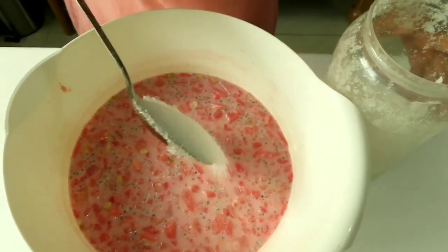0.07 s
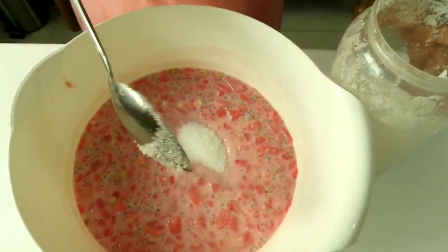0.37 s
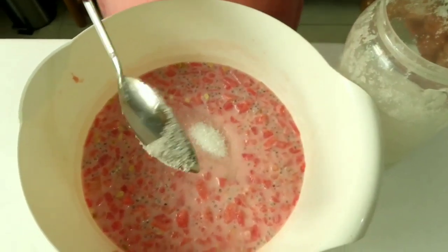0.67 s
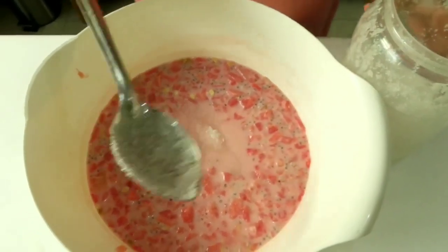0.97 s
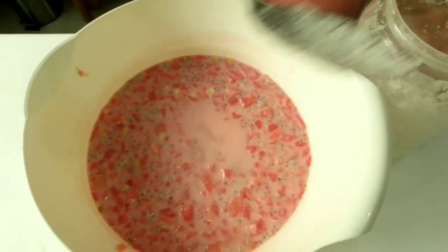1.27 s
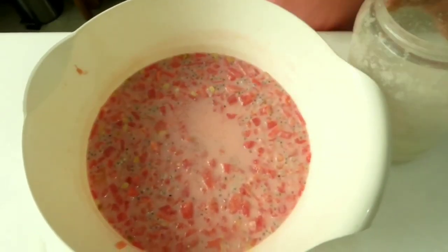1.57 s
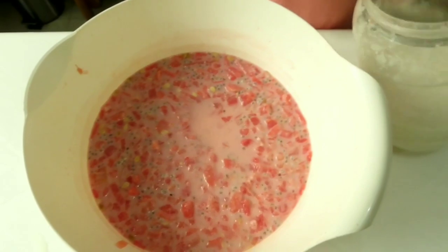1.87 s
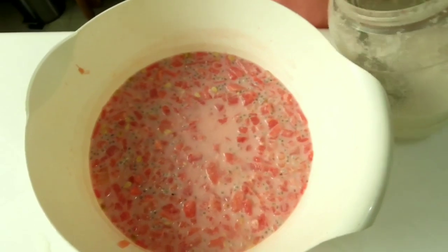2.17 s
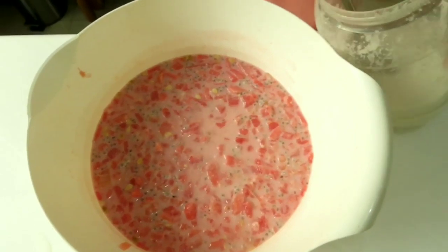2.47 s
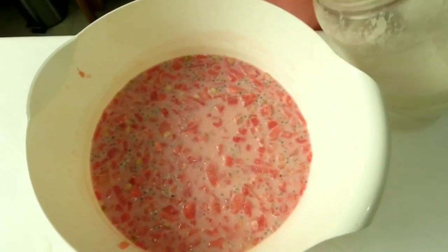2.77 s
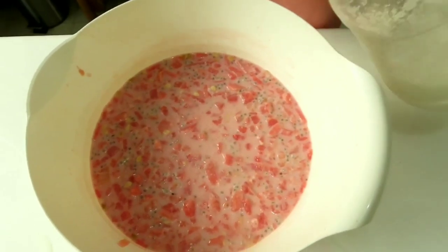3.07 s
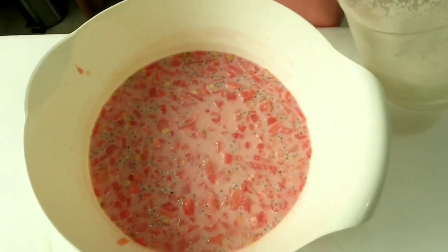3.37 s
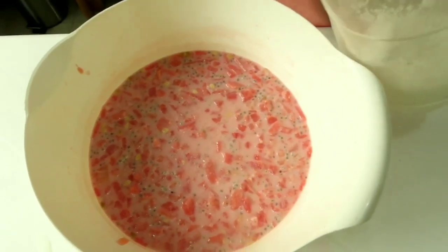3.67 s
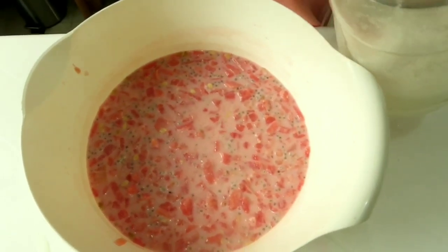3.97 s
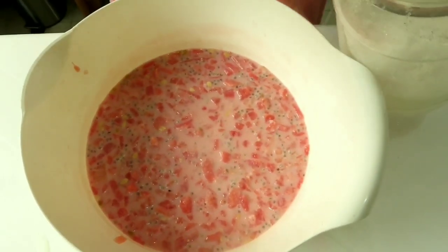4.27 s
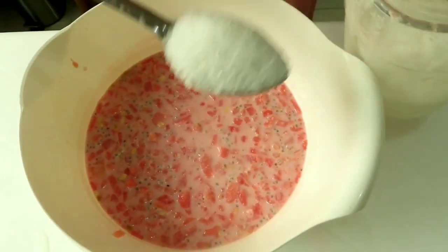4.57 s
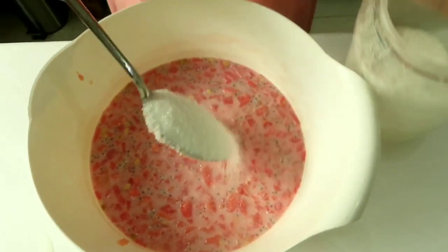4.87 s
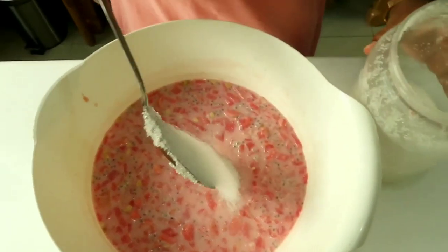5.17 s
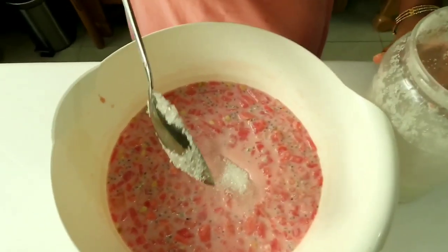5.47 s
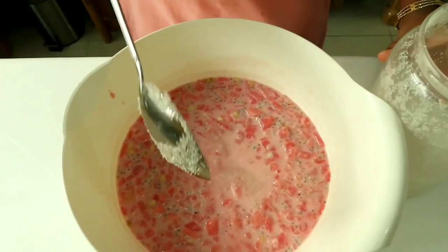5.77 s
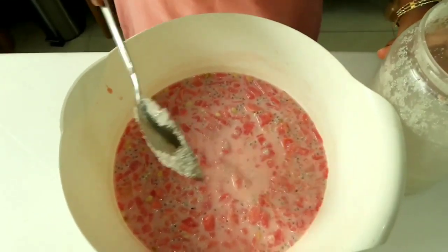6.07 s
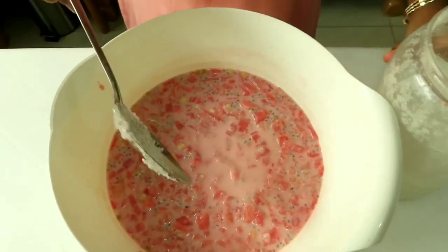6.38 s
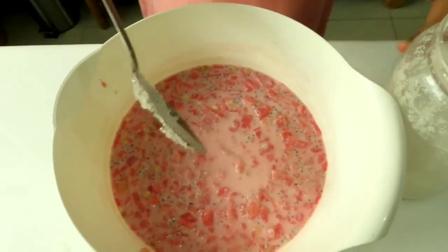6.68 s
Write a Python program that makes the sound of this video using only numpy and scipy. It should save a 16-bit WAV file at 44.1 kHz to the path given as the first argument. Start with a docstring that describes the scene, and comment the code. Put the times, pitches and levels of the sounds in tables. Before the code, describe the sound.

A steel spoon pours hissing sugar, clinks on a glass jar and scoops grittily, then two dull table thumps over a motor hum.

```python
"""Sugar is spooned from a glass jar into a bowl of fruit and milk in a small kitchen where a motor hums.
First sugar hisses off the steel spoon, and bangles begin to jingle faintly on a wrist.
Near 2 s the spoon clinks on the hand-held jar, then digs in with a gritty scrape.
Around 4 s loose crystals patter back into the jar as the heaped spoon lifts.
At 5 s it pours again, and two dull thumps shake the table."""
import sys
import numpy as np
from scipy import signal
from scipy.fft import rfft, irfft, next_fast_len
from scipy.io import wavfile
from scipy.ndimage import map_coordinates

SR = 44100
rng = np.random.default_rng(int(sys.argv[2]) if len(sys.argv) > 2 else 0)


def master(y):
    """Save y as 16-bit WAV."""
    cut = np.clip(np.atleast_2d(y).T, -1, 1)
    pcm = np.round(cut * 32767)  # scale
    wavfile.write(sys.argv[1], SR, pcm.astype(np.int16))


N = 301114


def amp(db):
    """Decibels to amplitude gain."""
    return 10 ** (np.asarray(db) / 20)


def unit(x):
    """Normalisation to rms 1."""
    return x / np.sqrt(np.mean(x ** 2) + 1e-20)


def along(points, hz):
    """Interpolation of (Hz, value) points on a logarithmic frequency axis."""
    freqs, values = np.transpose(points)
    return np.interp(np.log(hz + 1), np.log(freqs + 1), values)


def wobble(rate):
    """Random modulation: a smooth curve through `rate` random values a second."""
    return map_coordinates(rng.standard_normal(int(N * rate / SR) + 4), [np.arange(N) * rate / SR])


def filtered(x, response):
    """Linear filtering: the spectrum of x times a frequency response."""
    n = x.shape[-1]
    padded = next_fast_len(n + 8192)
    return irfft(rfft(x, padded) * response(np.fft.rfftfreq(padded, 1 / SR)), padded)[..., :n]


def coloured(x, spectrum):
    """Spectral shaping by (Hz, dB) points."""
    return filtered(x, lambda hz: amp(along(spectrum, hz)))


def add(track, s, sound):
    """Superposition: a sound joins the track at s seconds."""
    part = track[..., max(round(s * SR), 0):][..., :sound.shape[-1]]
    part += sound[..., :part.shape[-1]]


def ring(modes, attack, tilt_db=0):
    """Modal decay: a blow excites damped sines at slightly random strengths, tilted per octave; peak 1."""
    t = np.arange(SR * 6 // 10) / SR
    y = sum(amp(db + rng.normal() + tilt_db * np.log2(hz) - 60 * t / t60) * np.sin(2 * np.pi * hz * t)
            for hz, db, t60 in modes)
    y *= 1 - np.exp(-(t / attack) ** 2)
    return y / np.abs(y).max()


def burst(response, t60, attack):
    """Impact transient: filtered noise that decays exponentially; peak 1."""
    t = np.arange(SR // 20) / SR
    y = filtered(rng.standard_normal(len(t)), response) * (1 - np.exp(-t / attack)) * amp(-60 * t / t60)
    return y / np.abs(y).max()


def gestures(moves, attack, fade_db_per_s, sag_db_per_s=0):
    """Incoherent addition: (start, length, dB) envelopes rise, hold or sag, fade, and sum in power."""
    gains = []
    for s, length, db in moves:
        t = np.maximum(np.arange(N) / SR - s, 0)
        rise = np.sin(np.pi / 2 * np.minimum(t / attack, 1))
        gains.append(rise * amp(db - sag_db_per_s * t - fade_db_per_s * np.maximum(t - length, 0)))
    return np.linalg.norm(gains, axis=0)


# Likeness of reflections. Each row: frequency in Hz, left-right coherence.
ROOM_COHERENCE = [(220, 1), (600, .95), (2000, 0.98), (4000, 0.92), (7000, 0.9), (13000, 0.17)]
def spread(pair, coherence=ROOM_COHERENCE):
    """Mid-side mixing: two independent signals become left and right with a given coherence."""
    def weights(hz):
        angle = np.arccos(np.clip(along(coherence, hz), -1, 1)) / 2
        return np.array([np.cos(angle), np.sin(angle)])
    mid, side = filtered(pair, weights)
    return np.array([mid + side, mid - side])


def grains(rate, scatter_db, spectrum, coherence=ROOM_COHERENCE):
    """Shot noise: `rate` random collisions a second, a few much harder than the rest; stereo, rms 1."""
    hit = rng.random((2, N)) < rate / SR
    size = amp(scatter_db * np.minimum(rng.standard_normal((2, N)), 2))
    impulses = hit * size * rng.choice([-1, 1], (2, N))
    return unit(spread(coloured(impulses, spectrum), coherence))


def from_right(x, lead_s, louder_db):
    """Time and level cues: the right channel is earlier and, above the bass, louder."""
    side = np.array([[-1], [1]])
    def response(hz):
        shadow = amp(side * louder_db / 2 * hz / (hz + 600))
        return shadow * np.exp(1j * np.pi * side * hz * lead_s)
    return filtered(x, response)


# The kitchen's decay. Each row: frequency in Hz, time to fall 60 dB (T60) in seconds.
KITCHEN_T60 = [(100, 0.64), (500, 0.46), (2000, 0.57), (5000, 0.32), (12000, 0.34)]
def in_kitchen(x, wet_db, gap_s=0.006):
    """Reverberation: reflections from hard walls follow the direct sound after a short gap."""
    hz, _, noise = signal.stft(rng.standard_normal((2, SR * 6 // 10)), SR, nperseg=256)
    t = np.arange(noise.shape[-1]) * 128 / SR
    decay = amp(-60 * t / along(KITCHEN_T60, hz)[:, None])
    tail = spread(signal.istft(noise * decay, SR, nperseg=256)[1])
    response = np.pad(amp(wet_db) * tail / np.linalg.norm(tail[0]), ((0, 0), (round(gap_s * SR), 0)))
    response[:, 0] += 1  # direct path
    return signal.fftconvolve(np.atleast_2d(x), response, axes=1)[:, :x.shape[-1]]


# Moving air. Each row: frequency in Hz, spectral level in dB.
AIR_SPECTRUM = [(12, -35), (20, -12), (44, -3), (70, -6), (90, -7.5), (148, -3.5), (166, -8.5), (196, -3.5),
                (259, -13.5), (289, -14), (465, -17.5), (906, -18.5), (1300, -25), (1670, -25),
                (15500, -48)]
# Its stereo likeness. Each row: frequency in Hz, left-right coherence.
AIR_COHERENCE = [(100, 1), (250, 0.95), (600, 0.2), (2500, 0.28), (14000, 0.24)]
# The motor's partials. Each row: frequency in Hz, rms level in dB.
MOTOR_PARTIALS = [(48.4, -72), (96.9, -50.5), (145.3, -51.5), (193.8, -52.5), (742.9, -77)]
def room_tone():
    """Broadband and tonal noise: air moves and a motor hums, wavering in level and phase."""
    t = np.arange(N) / SR
    air = unit(spread(coloured(rng.standard_normal((2, N)), AIR_SPECTRUM), AIR_COHERENCE))
    hum = np.zeros(N)
    for hz, db in MOTOR_PARTIALS:
        amplitude = np.sqrt(2) * amp(db + 2.4 * wobble(4.2))
        hum += amplitude * np.sin(2 * np.pi * hz * t + 0.13 * wobble(2.95))
    return amp(-44) * air + hum


# Shivers of the bangles. Each row: start in seconds, length in seconds, relative level in dB.
BANGLE_SHAKES = [(1.095, 0.055, -61), (1.47, 0.075, -65), (1.645, 0.12, -55.5), (1.84, 0.095, -63),
                 (2.022, .16, -50.5), (2.429, 0.1, -55.5), (4.927, 0.078, -63), (5.78, 0.092, -59.5),
                 (6.79, .06, -62)]
# Modes of the hoops. Each row: frequency in Hz, level in dB, T60 in seconds.
HOOP_MODES = [(8500, 1, 0.017), (9100, -4, 0.018), (11560, 8, 0.018), (11950, -6, .02), (12400, 4, 0.025)]
def bangles():
    """Random excitation: many tiny contacts keep thin metal hoops ringing."""
    out = np.zeros((2, N))
    for s, length, db in BANGLE_SHAKES:
        count = int(length * SR)
        contacts = rng.standard_normal((2, count)) * np.hanning(count) ** 0.14
        shiver = signal.fftconvolve(contacts, ring(HOOP_MODES, attack=0.00035)[None], axes=1)
        add(out, s, amp(db - 2.5) * shiver / (shiver[:, :count].std() + 1e-9))
    return spread(out)


# Thin rustles. Each row: start in seconds, length in seconds, level in dB, half-width in Hz.
RUBS = [(0.046, 0.085, -55, 450), (2.119, 0.033, -55, 120)]
def rustles(centre_hz=5250):
    """Resonance: light rubbing excites one high, narrow band."""
    noise = rng.standard_normal(N)
    out = np.zeros(N)
    for s, length, db, width_hz in RUBS:
        band = unit(filtered(noise, lambda hz: 1 / (1 + ((hz - centre_hz) / width_hz) ** 2)))
        out += band * gestures([(s, length, db)], attack=0.02, fade_db_per_s=300)
    return out


# Soft pushes on the table. Each row: start in seconds, peak level in dB.
TABLE_NUDGES = [(1.528, -30), (2.112, -31), (2.381, -27.5), (2.679, -31), (2.772, -30), (3.931, -33.5),
                (4.012, -27.5), (4.27, -32), (6.663, -31)]
# The table's lowest modes. Each row: frequency in Hz, level in dB, T60 in seconds.
SWAY_MODES = [(91, 6.5, 0.22), (108.7, 6, 0.12), (234, -5, 0.17)]
def nudges():
    """Low-mode excitation: a gentle push stirs only the slowest sway of the table."""
    out = np.zeros(N)
    for s, db in TABLE_NUDGES:
        add(out, s, amp(db) * ring(SWAY_MODES, attack=0.0078))
    return out


# Dull blows. Each row: start in seconds, level in dB, contact cutoff in Hz, relative boom in dB.
TABLE_BLOWS = [(5.3332, -0.9, 790, 2.5), (5.6601, -12, 396, -2), (5.6712, -12, 395, -4)]
# The table top's first heave. Each row: frequency in Hz, level in dB, T60 in seconds.
HEAVE_MODES = [(228.4, 2, 0.028), (292, -13, 0.069), (544, -11.5, 0.039)]
# The boom that follows. Each row: frequency in Hz, level in dB, T60 in seconds.
BOOM_MODES = [(88.4, -21.5, 0.65), (159.8, -13, 0.33), (236, -32, 0.25), (267.7, -25, 0.28),
              (328, -20.5, 0.21), (535, -36.5, 0.36), (614, -24, 0.11)]
def thumps():
    """Soft contact is a low-pass filter: the table heaves, then booms, while things on it rattle."""
    out = np.zeros((2, N))
    rattle_spectrum = [(700, 5.5), (1250, -4), (2400, -14), (9000, -34)]  # Hz, dB
    for s, db, cutoff_hz, boom_db in TABLE_BLOWS:
        blow = ring(HEAVE_MODES, attack=0.00098) + amp(boom_db - 9) * ring(BOOM_MODES, attack=0.012)
        # The table radiates no deep bass.
        passband = signal.butter(2, [55, cutoff_hz], "bandpass", fs=SR, output="sos")
        add(out, s, amp(db) * in_kitchen(signal.sosfilt(passband, blow), wet_db=-11))
        rattle = burst(lambda hz: amp(along(rattle_spectrum, hz)), t60=0.065, attack=0.00063)
        add(out, s, amp(db - 20.5) * in_kitchen(np.pad(rattle, (0, SR // 3)), wet_db=-4.5))
    return out


# Touches of the spoon. Each row: start in seconds, level in dB, centre in Hz, half-width in octaves.
SPOON_TICKS = [(1.013, -36.5, 4050, 0.12), (1.1292, -37.5, 2780, 0.36), (1.437, -40, 2640, 0.43),
               (3.9758, -30, 3830, 0.61), (4.128, -30.5, 3930, 0.64), (4.169, -32, 3980, 1.2),
               (4.576, -34.5, 3460, 1.3), (4.8791, -26.5, 3360, 0.45), (5.539, -37.5, 3400, 0.33),
               (5.668, -35, 3200, 0.59), (6.511, -43.5, 8450, 0.29), (6.591, -39, 2800, 0.55)]
def ticks():
    """Point excitation: each glancing touch is coloured by the spot that it meets."""
    out = np.zeros(N)
    for s, db, centre_hz, octaves in SPOON_TICKS:
        band = lambda hz: 1 / (1 + (np.log2((hz + 1) / centre_hz) / octaves) ** 2)
        add(out, s, amp(db) * burst(band, t60=0.017, attack=0.00032))
    return in_kitchen(out, wet_db=-13)


# Pours. Each row: start in seconds, length in seconds, level in dB, fade in dB per second.
SPOON_POURS = [(0.039, .34, -51, 60), (0.541, .05, -53, 280), (5.0, .1, -60, 100), (5.07, 0.28, -51, 81),
               (5.47, 0.18, -58, 180)]
# Falling sugar. Each row: frequency in Hz, spectral level in dB.
HISS_SPECTRUM = [(500, -2), (2000, -3), (4800, -1.5), (7000, -3), (10000, -1.5), (14000, -2), (15700, -8)]
# Its stereo likeness. Each row: frequency in Hz, left-right coherence.
HISS_COHERENCE = [(2000, 0.6), (7000, 1), (13000, 0.56)]
def pouring():
    """Granular flow: an uneven stream of crystals lands in the bowl, thinning as the spoon empties."""
    pours = [gestures([(s, length, db)], attack=0.03, fade_db_per_s=fade, sag_db_per_s=2)
             for s, length, db, fade in SPOON_POURS]
    flow = np.linalg.norm(pours, axis=0) * amp(0.8 * wobble(25))
    return flow * grains(rate=9000, scatter_db=5.5, spectrum=HISS_SPECTRUM, coherence=HISS_COHERENCE)


# Spills. Each row: start in seconds, length in seconds, fine patter in dB, coarse grains in dB.
SPOON_SPILLS = [(3.789, .26, -51.5, -54), (4.11, 0.12, -55, -52), (4.2, .3, -45.5, -53),
                (4.544, .07, -53, -57.5)]
# Fine patter in the jar. Each row: frequency in Hz, spectral level in dB.
PATTER_SPECTRUM = [(600, -25), (1800, -12), (2500, -1), (3200, -1), (4300, 1), (5400, -9), (8000, -10),
                   (11000, -14.5), (15000, -20)]
# A thin rasp as the spoon leaves. Each row: frequency in Hz, spectral level in dB.
RASP_SPECTRUM = [(1400, -27), (2000, 3), (2350, -11), (2750, 5), (3500, -19), (7000, -33)]
def spilling():
    """Granular impacts: off the heaped spoon, fine crystals patter and coarse ones tick; a rasp follows."""
    fine = [(s, length, db) for s, length, db, _ in SPOON_SPILLS]
    coarse = [(s, length, db) for s, length, _, db in SPOON_SPILLS]
    attack_s, fade_db_per_s = 0.072, 263
    patter = gestures(fine, attack_s, fade_db_per_s)
    patter = patter * grains(rate=3400, scatter_db=7, spectrum=PATTER_SPECTRUM)
    ticking = gestures(coarse, attack_s, fade_db_per_s)
    ticking = ticking * grains(rate=130, scatter_db=5, spectrum=HISS_SPECTRUM)
    leaving = gestures([(4.6, 0.19, -56)], attack_s, fade_db_per_s=110)
    rasp = leaving * grains(rate=4500, scatter_db=4, spectrum=RASP_SPECTRUM)
    return in_kitchen(patter + ticking + rasp, wet_db=-16)


# Strokes through the sugar. Each row: start in seconds, length in seconds, grinding in dB,
# sliding in dB, jar rumble in dB.
SPOON_STROKES = [(2.203, 0.059, -42, -45.5, -36.5), (2.305, 0.07, -43, -64, -39),
                 (2.524, 0.12, -45, -48, -52), (2.713, 0.13, -42, -38.5, -43), (2.904, 0.23, -38, -40, -45),
                 (3.123, .14, -34, -33, -41), (3.273, 0.31, -62, -34, -57),
                 (3.539, 0.071, -39.5, -39.5, -42)]
STROKE_ATTACK_S = 0.097
# Crushed sugar. Each row: frequency in Hz, spectral level in dB.
GRIT_SPECTRUM = [(300, -18), (560, -5.5), (850, -19), (1400, -4), (2300, -4.5), (3000, -5), (4200, -5),
                 (5300, -15.5), (8000, -20), (11000, -24.5), (15000, -35)]
# Crystals on steel. Each row: frequency in Hz, spectral level in dB.
SLIDE_SPECTRUM = [(500, -16.5), (1600, -9), (2350, -0.5), (3000, -2), (3700, 0), (4550, 2), (5400, -6),
                  (8000, -9), (10500, -13), (15000, -18)]
def scooping():
    """Stick-slip friction: the spoon grinds and cracks crumbs; loose crystals slide on after it stops."""
    grinds = [(s, length, db) for s, length, db, _, _ in SPOON_STROKES]
    slides = [(s, length, db) for s, length, _, db, _ in SPOON_STROKES]
    scrape = gestures(grinds, STROKE_ATTACK_S, fade_db_per_s=132)
    slide = gestures(slides, STROKE_ATTACK_S, fade_db_per_s=55)
    slips = unit(amp(0.71 * wobble(130)))
    grinding = scrape * slips * grains(rate=2500, scatter_db=1.5, spectrum=GRIT_SPECTRUM)
    crumbs = scrape * amp(-6) * grains(rate=67, scatter_db=2, spectrum=GRIT_SPECTRUM)
    flicker = unit(amp(1.35 * wobble(90)))
    sliding = slide * flicker * grains(rate=7400, scatter_db=1.5, spectrum=SLIDE_SPECTRUM)
    return in_kitchen(grinding + crumbs + sliding, wet_db=-13)


# The hand tilts the jar. Each row: start in seconds, length in seconds, level in dB.
JAR_TILTS = [(1.652, 0.2, -41.5), (3.858, 0.19, -50), (6.49, 0.2, -49)]
# The hollow of the jar. Each row: frequency in Hz, spectral level in dB.
HOLLOW_SPECTRUM = [(60, -18), (130, 0), (230, 5.5), (330, 6), (450, -1), (600, -3), (850, -12), (2000, -38)]
def handling():
    """Friction noise: the jar rubs and rumbles in the hand when it is tilted or the spoon pushes."""
    strokes = [(s, length, db) for s, length, _, _, db in SPOON_STROKES]
    tilts = gestures(JAR_TILTS, attack=0.086, fade_db_per_s=116)
    pushes = gestures(strokes, STROKE_ATTACK_S, fade_db_per_s=116)
    rumble = grains(rate=990, scatter_db=3, spectrum=HOLLOW_SPECTRUM)
    return in_kitchen(np.hypot(tilts, pushes) * rumble, wet_db=-7)


# Pushes that reach the jar's base. Each row: start in seconds, level in dB.
BASE_KNOCKS = [(2.2223, -14), (2.477, -28), (2.674, -28.5), (3.25, -19), (3.297, -32), (4.039, -19)]
# Modes of the base. Each row: frequency in Hz, level in dB, T60 in seconds.
BASE_MODES = [(213, -23, 0.021), (344, 14.5, 0.034), (414, 14.5, 0.021), (568, -1.5, 0.068),
              (1052, 12, 0.018), (1320, -6.5, 0.0073)]
def knocks():
    """Impulse response: the spoon's hardest pushes briefly ring the base of the jar."""
    out = np.zeros((2, N))
    for s, db in BASE_KNOCKS:
        add(out, s, amp(db) * in_kitchen(ring(BASE_MODES, attack=0.00043), wet_db=-4))
    return out


# The spoon breaks the largest lumps. Each row: start in seconds, level in dB.
LUMP_BREAKS = [(2.2162, -11), (2.2209, -5), (2.24, -19), (2.2564, -15.5), (2.2881, -14), (3.067, -16),
               (3.089, -18), (3.117, -18), (3.141, -15.5), (3.165, -15), (3.173, -14), (3.197, -17),
               (3.212, -14), (3.2226, -11.5), (3.292, -15.5), (3.353, -18.5), (3.41, -20), (3.581, -21)]
def crunches():
    """Brittle fracture: packed sugar gives way within milliseconds, each lump at its own pitch."""
    out = np.zeros(N)
    pitches_hz = 2900 * np.exp(0.32 * rng.standard_normal(len(LUMP_BREAKS)))
    for (s, db), pitch_hz in zip(LUMP_BREAKS, pitches_hz):
        lump = lambda hz: amp(along(GRIT_SPECTRUM, hz) + 6.7 * np.exp(-((hz - pitch_hz) / 600) ** 2))
        add(out, s, amp(db) * burst(lump, t60=0.02, attack=0.00025))
    return in_kitchen(out, wet_db=-8)


# The spoon strikes the glass. Each row: start in seconds, level in dB, tilt in dB per octave.
SPOON_CLINKS = [(1.9017, -4, 2), (4.038, -26.5, 2.5)]
# Modes of jar and spoon. Each row: frequency in Hz, level in dB, T60 in seconds.
JAR_MODES = [(277, -5.5, 0.026), (487, -14, 0.05), (580, -8.5, 0.036), (1220, -6, 0.02), (1586, 1, 0.012),
             (2157, 3, 0.013), (2430, 6, .011), (3840, 1.5, 0.0067), (4473, 1, 0.011), (5350, -6, 0.0082),
             (9730, -18, 0.0032), (1530, -28, 0.22), (1630, -26, 0.23), (2165, -27, 0.11),
             (2340, -27, 0.39), (2270, -34, 0.21), (4290, -50.5, 0.7)]
def clinks():
    """Damped vibration: steel cracks on glass, and hand and sugar cut it to a clack and a weak ring."""
    out = np.zeros((2, N))
    for s, db, tilt_db in SPOON_CLINKS:
        clack = ring(JAR_MODES, attack=0.0017, tilt_db=tilt_db)
        crack = burst(lambda hz: hz / (hz + 2500) / (1 + (hz / 10000) ** 4), t60=0.019, attack=0.00055)
        add(out, s, amp(db) * in_kitchen(clack, wet_db=-6.5))
        add(out, s, amp(db - 11.5) * in_kitchen(np.pad(crack, (0, SR // 4)), wet_db=-9.5))
    return out


def scene():
    """Superposition of all sources, with the jar a little to the right of the bowl."""
    jar = clinks() + crunches() + knocks() + scooping() + spilling() + handling() + ticks()
    jar = from_right(jar, lead_s=1.5e-5, louder_db=1.3)
    table = thumps() + nudges()
    return jar + table + pouring() + rustles() + bangles() + room_tone()


def record(dry):
    """Band limiting: nothing above 15.5 kHz passes."""
    return filtered(dry, lambda hz: hz < 15500)


dry = scene()
out = record(dry)
master(out)
```